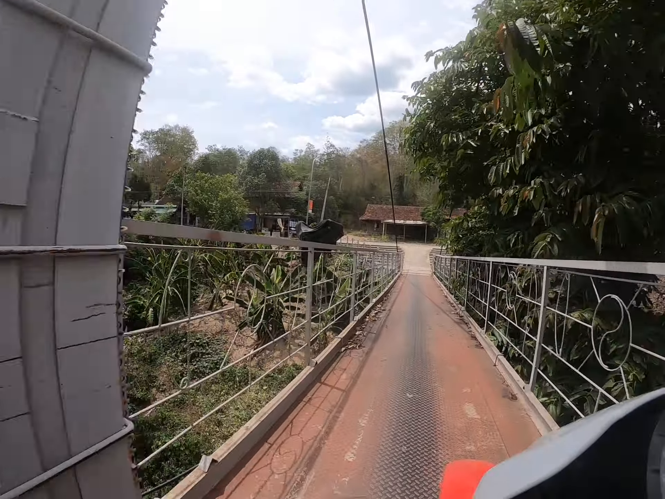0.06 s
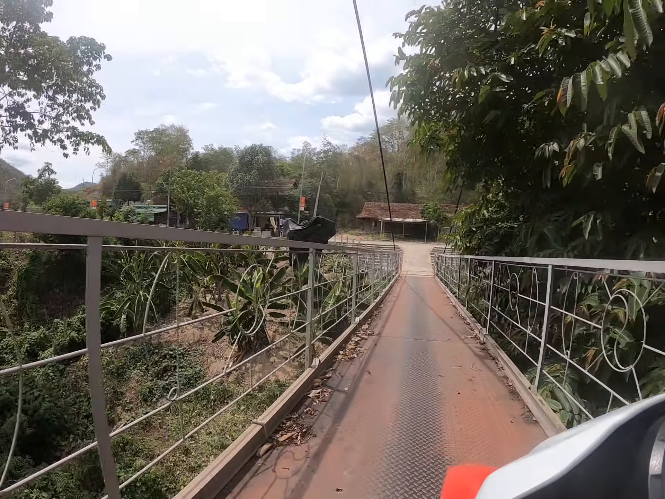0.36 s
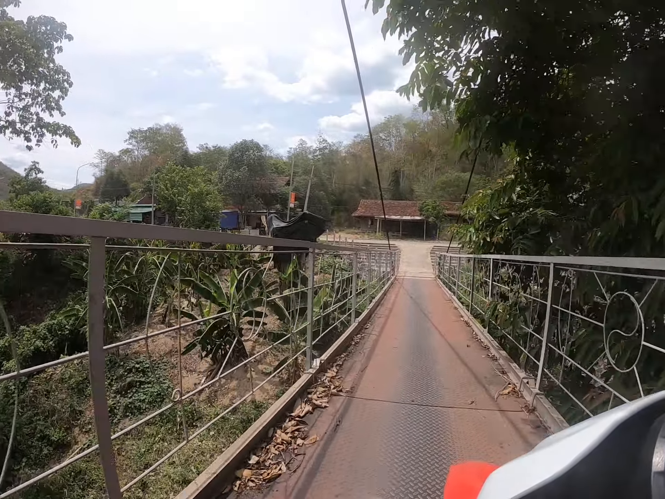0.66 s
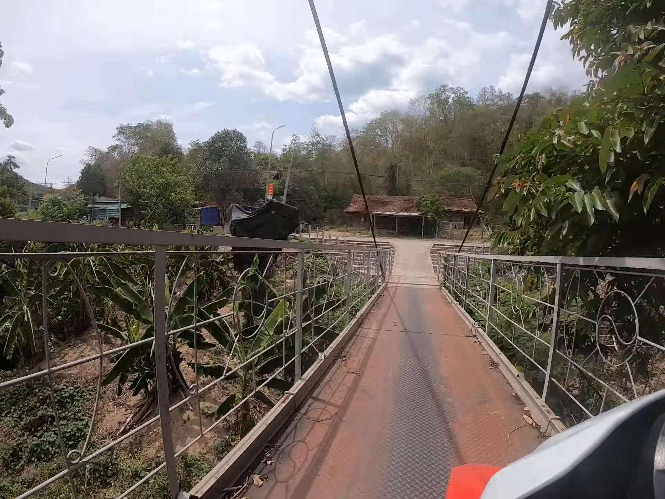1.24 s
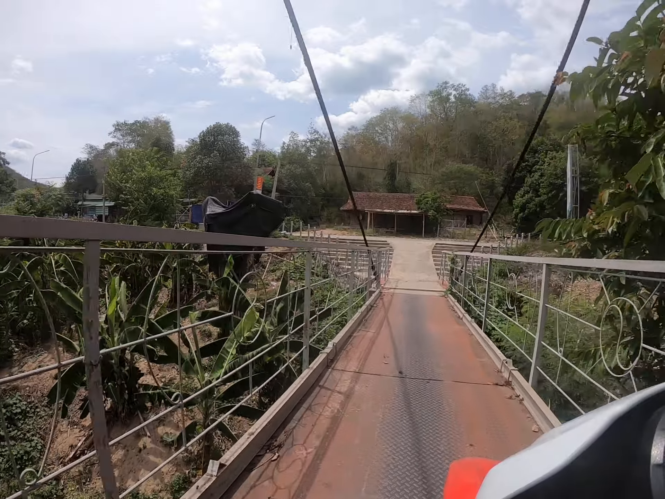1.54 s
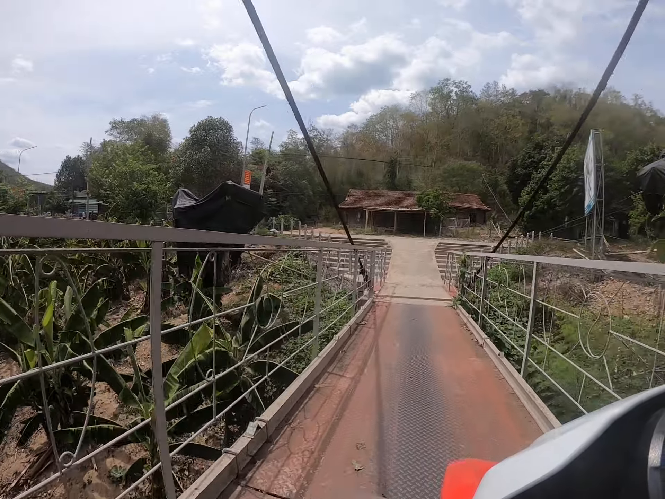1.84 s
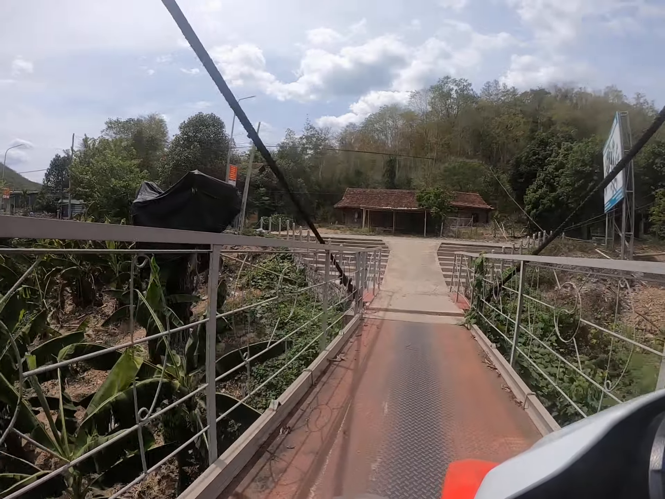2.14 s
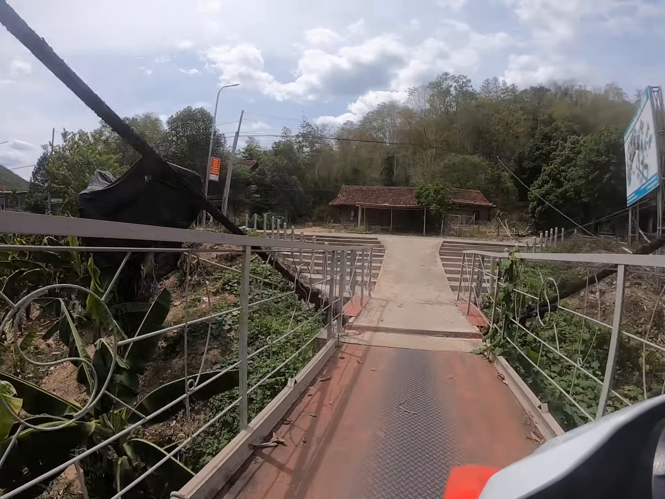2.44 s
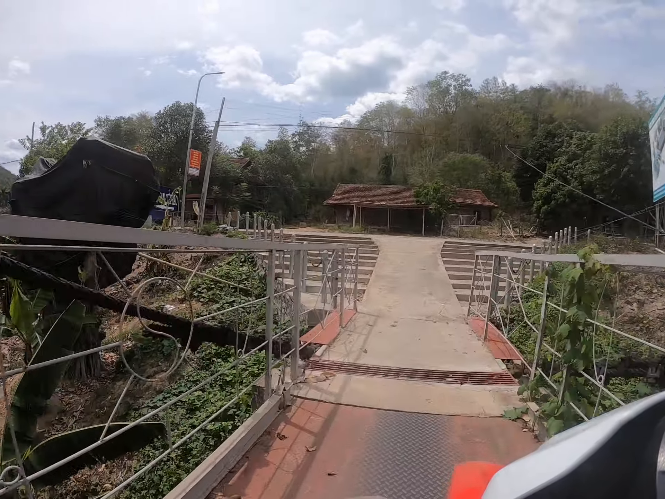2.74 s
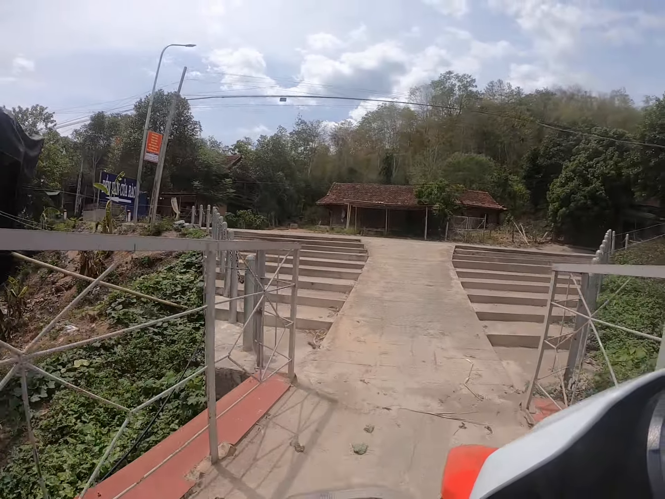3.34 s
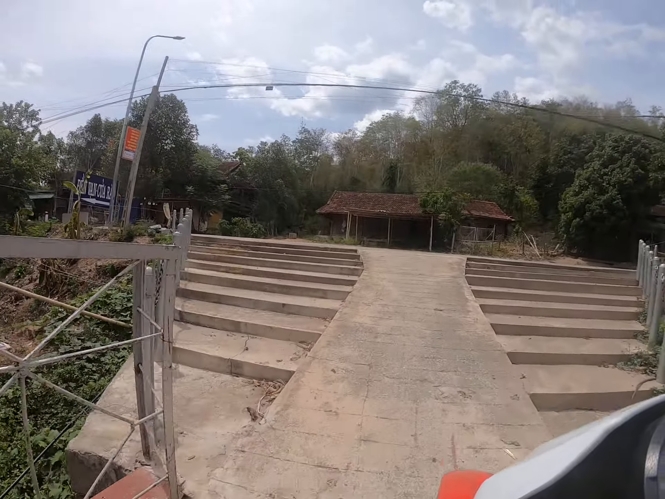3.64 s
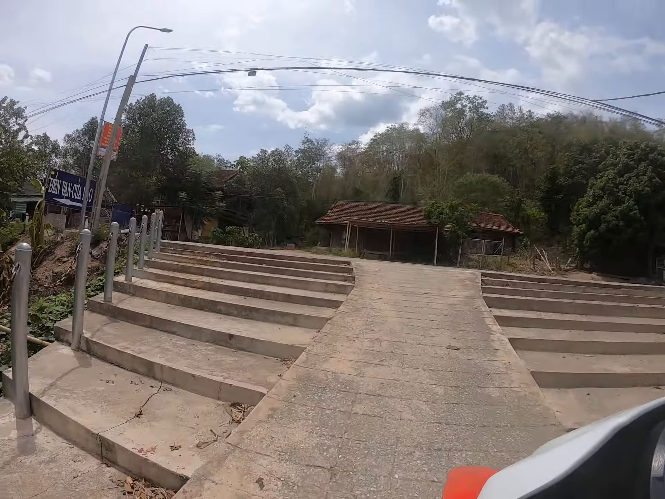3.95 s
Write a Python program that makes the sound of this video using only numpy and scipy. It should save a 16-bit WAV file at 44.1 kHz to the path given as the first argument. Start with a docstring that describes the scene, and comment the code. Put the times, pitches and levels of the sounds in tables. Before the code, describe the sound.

Small motorbike riding across a steel bridge, with deck rumble, thumps and metallic rattles.

```python
"""Small motorbike over a steel bridge deck

Heard from the saddle, a single-cylinder bike rides over the deck and off onto concrete.
The engine burbles, picks up after a second and slowly sags; valves clatter, the piston ticks
and a gear whines. The deck rumbles and booms under the tyres, plate joints set off thumps
and rattles, and loose parts tick and clank."""
import sys
import numpy as np
from scipy import signal
from scipy.fft import rfft, irfft, next_fast_len
from scipy.io import wavfile
from scipy.ndimage import map_coordinates

SR = 44100
rng = np.random.default_rng(int(sys.argv[2]) if len(sys.argv) > 2 else 0)


def generate_wav(signal):
    """Clip the signal to [-1, 1] and save it as 16-bit WAV at the path in sys.argv[1]."""
    frames = np.transpose(np.atleast_2d(signal))
    scaled = np.clip(frames, -1, 1) * 32767
    pcm = np.round(scaled).astype(np.int16)
    wavfile.write(sys.argv[1], SR, pcm)


N = 176400
T = np.arange(N) / SR


def amp(db):
    """Decibels to gain."""
    return 10 ** (np.asarray(db) / 20)


def unit(x):
    """Scale to rms 1."""
    return x / np.sqrt(np.mean(x ** 2) + 1e-20)


def along(points, hz):
    """Interpolate (Hz, value) points on a log axis."""
    points_hz, values = np.transpose(points)
    return np.interp(np.log(hz + 1), np.log(points_hz + 1), values)


def curve(rows):
    """Interpolate (s, value) points at every sample."""
    return np.interp(T, *np.transpose(rows))


def wobble(rate_hz):
    """Smooth random curve, rate_hz knots a second."""
    return map_coordinates(rng.standard_normal(8192), [T * rate_hz], mode="wrap")


def band(hz, centre_hz, q):
    """Gain of one resonance."""
    return 1 / np.hypot(1, q * (hz / centre_hz - centre_hz / (hz + 1)))


def filtered(x, gain, causal=False):
    """Apply gain(hz) to x, with minimum phase if causal."""
    size = 2 * next_fast_len(N // 2 + 8192)
    response = gain(np.fft.rfftfreq(size, 1 / SR))
    if causal:
        cepstrum = irfft(np.log(np.maximum(response, 1e-6)))
        cepstrum[1:size // 2] *= 2
        cepstrum[size // 2 + 1:] = 0
        response = np.exp(rfft(cepstrum))
    return irfft(rfft(x, size) * response, size)[:N]


def noise(spectrum, centre_hz=1, q=0):
    """Noise of rms 1 shaped by (Hz, dB) points and, if q > 0, one resonance."""
    white = rng.standard_normal(N)
    return unit(filtered(white, lambda hz: amp(along(spectrum, hz)) * band(hz, centre_hz, q)))


def burst(start_s, attack_s, hold_s, decay_s):
    """Linear attack; exponential decay from hold_s after the start."""
    rise = np.clip((T - start_s) / attack_s, 0, 1)
    return rise * np.exp(-np.maximum(T - start_s - hold_s, 0) / decay_s)


def pulses(cycles, share, scatter_db):
    """One uneven impulse each time the engine passes this share of its cycle."""
    hit = np.diff(np.floor(cycles - share), prepend=np.floor(-share))
    return hit * amp(scatter_db * rng.standard_normal(256))[cycles.astype(int)]


def strikes(cycles, share, decay_s):
    """A decaying noise burst at the same point of every cycle."""
    pole = np.exp(-1 / (decay_s * SR))
    envelope = signal.lfilter([1], [1, -pole], pulses(cycles, share, scatter_db=1.5))
    return envelope * rng.standard_normal(N)


def tyre_rumble():
    """Tyres on the deck, with wind in the lowest bass."""
    # Each row: time in seconds, level in dB.
    rolling_level = [(0, -19.5), (.11, -22.5), (.17, -24.5), (.42, -17.5), (.52, -19), (.71, -22.5),
                     (.82, -16), (1.08, -19.5), (1.2, -21), (1.85, -20), (2.2, -24), (3.2, -22.5),
                     (3.55, -24.5), (3.8, -27), (4, -33)]
    # Each row: frequency in Hz, relative level in dB.
    deck_spectrum = [(15, -40), (28, -4), (45, 0), (60, -1.5), (75, 0), (120, -1.5), (190, -6.5),
                     (240, -14), (310, -12), (400, -22.5), (800, -22.5), (1500, -35.5), (5000, -52),
                     (12000, -100)]
    return amp(curve(rolling_level) + 0.09 * wobble(14)) * noise(deck_spectrum)


def panel_booms():
    """Each deck panel hums near its own note as the bike rolls over it."""
    # Each row: start in seconds, hold in seconds, pitch in Hz, level in dB.
    panels = [(0.46, 0.96, 64, -29), (0.625, 0.44, 140, -28.5), (0.937, .14, 121, -26),
              (.98, 0.059, 197, -26), (1.194, 0.26, 143, -21.5), (1.739, 0.22, 126, -20),
              (2.392, 0.28, 131, -26), (3.234, .05, 175, -28)]
    edge_s = 0.016
    out = np.zeros(N)
    for start_s, hold_s, hz, db in panels:
        envelope = amp(db + 1.6 * wobble(5.7)) * burst(start_s, edge_s, hold_s, edge_s)
        out += envelope * np.sin(2 * np.pi * (hz * T + rng.random()) + .5 * wobble(5.5))
    return out


def road_joints():
    """Each joint in deck or concrete thumps the wheels and shakes out a rough metallic rattle."""
    # Each row: start in seconds, hold in seconds, thump in dB, thump centre in Hz, rattle in dB.
    joints = [(0.125, 0.041, -16.5, 103, -32), (0.173, 0.036, -15, 199, -33.5),
              (0.215, 0.057, -24, 253, -33), (0.328, 0.046, -17, 125, -31),
              (0.384, 0.012, -14.5, 129, -31.5), (0.804, 0.015, -18, 121, -28),
              (0.829, 0.059, -23.5, 151, -32.5), (0.895, 0.21, -26.5, 160, -39.5),
              (3.232, 0.041, -18.5, 310, -34), (3.531, 0.0082, -25.5, 320, -39),
              (3.884, 0.087, -28, 296, -44)]
    # Each row of both: frequency in Hz, relative level in dB.
    thump_spectrum = [(30, -19), (100, -3), (170, 4.5), (250, -2), (310, 5.5), (420, -4.5), (800, 0),
                      (1200, -39), (3000, -32), (8000, -67)]
    rattle_spectrum = [(200, -6), (500, 11.5), (800, 7), (1400, -4.5), (2000, 0), (3400, -2), (4500, -10),
                       (6000, -23), (8000, -20.5), (11000, -37), (12500, -43), (15000, -60)]
    attack_s, roughness_db = 0.005, 1.5
    thumps, shake = np.zeros(N), np.zeros(N)
    for start_s, hold_s, thump_db, centre_hz, rattle_db in joints:
        thump = noise(thump_spectrum, centre_hz, q=2.43)
        thumps += amp(thump_db) * burst(start_s, attack_s, hold_s, decay_s=0.028) * thump
        shake += amp(rattle_db) * burst(start_s, attack_s, hold_s, decay_s=0.024)
    rattle = unit(amp(roughness_db * wobble(360)) * noise(rattle_spectrum))
    return thumps + shake * rattle


def loose_ticks():
    """Loose parts clack, each around its own pitch."""
    # Each row: start in seconds, level in dB, centre in Hz, decay in seconds.
    ticks = [(0.041, -33, 1400, .008), (0.097, -28, 1410, 0.0052), (.13, -25, 3300, .007),
             (.153, -23, 1500, .008), (0.241, -21, 2000, .008), (0.243, -43, 8200, 0.022),
             (.275, -37.5, 3520, 0.04), (0.3, -28, 1410, 0.0054), (.328, -26, 3100, .003),
             (.338, -23.5, 3070, .016), (.392, -30, 4000, .005), (.405, -50, 8000, 0.03),
             (.368, -30, 2800, .008), (.416, -23, 850, .007), (0.514, -31, 1400, 0.0059),
             (0.591, -27, 1400, 0.0051), (.811, -31, 2200, .007), (.835, -27, 2600, .007),
             (0.845, -41, 7200, 0.03), (.852, -23, 3600, .01), (.869, -23, 2700, .009),
             (2.875, -20, 1400, 0.004), (3.067, -23, 4000, 0.0028), (3.584, -31, 3000, 0.0067),
             (3.624, -23, 3160, .011)]
    # Each row: frequency in Hz, relative level in dB.
    tick_spectrum = [(200, -5), (1000, 30.5), (4000, 3), (8000, -3), (11000, -10), (13000, -23),
                     (15000, -38)]
    attack_s = .0015
    out = np.zeros(N)
    for start_s, db, centre_hz, decay_s in ticks:
        envelope = amp(db) * burst(start_s, attack_s, 2 * attack_s, decay_s)
        out += envelope * noise(tick_spectrum, centre_hz, q=3.2)
    return out


def metal_clanks():
    """A loose metal part is struck and rings briefly."""
    # Each row: start in seconds, level in dB, pitch in Hz, decay in seconds.
    clanks = [(0.2432, -11.5, 1405, .0035), (3.975, -27, 1462, .03), (3.978, -26, 1587, .03)]
    attack_s = 0.0013
    out = np.zeros(N)
    for start_s, db, hz, decay_s in clanks:
        envelope = amp(db) * burst(start_s, attack_s, 2 * attack_s, decay_s)
        out += envelope * np.sin(2 * np.pi * hz * (T - start_s) + .5 * wobble(150))
    return out


def drive_ring():
    """One sharp metallic mode of the drive sings while the engine pulls."""
    # Each row: time in seconds, level in dB.
    ring_level = [(0, -62), (1.3, -56), (1.45, -46), (1.7, -48), (1.8, -41), (2.2, -42), (2.7, -48),
                  (3, -42.5), (3.7, -45), (4, -53)]
    mode_hz, blur_rad, waver_db = 3170, 1.7, 3
    ring = np.sin(2 * np.pi * mode_hz * T + blur_rad * wobble(50))
    return amp(curve(ring_level)) * unit(amp(waver_db * wobble(25.2)) * ring)


def gear_whine(cycles):
    """A fuzzy mesh tone that swells and chirps with every power stroke."""
    # Each row: time in seconds, level in dB.
    whine_level = [(0, -62), (1.1, -54), (1.35, -48), (1.6, -52), (2.3, -48), (2.5, -42), (2.8, -40.5),
                   (3.1, -48), (3.25, -43.5), (3.42, -44), (3.7, -55)]
    mesh_order, ripple_rad, blur_hz = 119.5, 1.3, 35
    throb_db, waver_db = 3.5, 1
    cycle_rad = 2 * np.pi * cycles
    mesh_rad = mesh_order * cycle_rad + ripple_rad * np.sin(cycle_rad)
    fuzz = wobble(2 * blur_hz) * np.sin(mesh_rad) + wobble(2 * blur_hz) * np.cos(mesh_rad)
    tone = np.sin(mesh_rad) + .7 * fuzz
    swell = amp(throb_db * np.sin(cycle_rad) + waver_db * wobble(5.4))
    return amp(curve(whine_level)) * unit(tone * swell)


def piston_slap(cycles):
    """The piston knocks the cylinder once a cycle: a dry tick, hardest as the throttle eases."""
    # Each row: time in seconds, level in dB.
    slap_level = [(0, -54), (1.1, -51), (1.3, -46), (2, -48), (2.6, -46.5), (3, -42), (3.5, -42.5),
                  (4, -46)]
    knocks = strikes(cycles, share=.16, decay_s=.0026)
    cylinder = filtered(knocks, lambda hz: band(hz, centre_hz=2300, q=4.2) ** 2, causal=True)
    return amp(curve(slap_level)) * unit(cylinder)


def valve_clatter(cycles):
    """Valve and piston impacts and a wash of friction ring the casing, brighter under load."""
    # Each row: share of the cycle, relative level in dB, centre in Hz, decay in seconds.
    impacts = [(.08, 2.5, 3850, .0035), (.12, -3, 1400, .003), (.55, -7, 1550, .016), (.59, -1, 3850, .002),
               (.82, 6, 3850, .004)]
    # Each row: frequency in Hz, relative gain in dB.
    casing_colour = [(100, -17.5), (280, 0), (450, 0.5), (800, -16.5), (1050, -10), (1500, -3), (2000, -10),
                     (3000, -15.5), (4300, -23), (5000, -27.5), (6100, -31.5), (7500, -25), (9500, -36),
                     (10900, -42), (11800, -55), (13300, -49), (15000, -81)]
    # Each row: centre in Hz, width in Hz, rise in dB.
    casing_modes = [(292.3, 48, 12.5), (595.3, 28, 13.5), (920, 27, 5), (1350.5, 176, 12), (1653, 136, 6.5),
                    (2260, 110, 9), (3020, 460, 9), (3480, 39, 7), (3900, 83, 4.5), (4010, 84, 12),
                    (4355, 80, 7.5), (5420, 200, 3.5)]
    # Each row: time in seconds, level in dB before the treble shelf.
    effort = [(0, -30.5), (.65, -31.5), (1.1, -30.5), (1.45, -27.5), (2, -28), (2.7, -27), (3.4, -27.5),
              (3.75, -28.5), (4, -28)]
    friction_db = -6.5
    shelf_hz, shelf_db_per_db, flat_at_db = 2030, 0.87, -26

    def casing_gain(hz):
        modes_db = sum(rise_db / (1 + (2 * (hz - centre_hz) / width_hz) ** 2)
                       for centre_hz, width_hz, rise_db in casing_modes)
        return amp(along(casing_colour, hz) + modes_db)

    hits = np.zeros(N)
    for share, db, centre_hz, decay_s in impacts:
        strike = strikes(cycles, share, decay_s)
        hits += amp(db) * filtered(strike, lambda hz: band(hz, centre_hz, q=1.7) ** 2)
    friction = amp(friction_db) * rng.standard_normal(N)
    ring = unit(filtered(hits + friction, casing_gain, causal=True))
    treble = filtered(ring, lambda hz: 1 - 1 / (1 + (hz / shelf_hz) ** 6))
    effort_db = curve(effort)
    treble_gain = amp(shelf_db_per_db * (effort_db - flat_at_db))
    return amp(effort_db) * (ring - treble + treble_gain * treble)


def engine_drone(cycles):
    """Low engine orders and thin gear lines, locked to the crank and wavering in level."""
    # Each entry: a multiple of the firing rate.
    orders = [2, 3, 4, 5, 7.15, 8, 9, 11.3, 12, 22, 28.7, 34.5, 43.9, 51, 53, 65.2, 80.2, 123.5]
    # Each entry: that order's relative level in dB.
    orders_db = [-9, -10, 1, -4, -12, -17, -22, -19, -24, -26, -24, -25, -30, -22, -22, -22, -31, -28]
    # Each row: time in seconds, level in dB.
    drone_level = [(0, -37), (1.15, -34), (1.52, -22.5), (2.1, -22.5), (2.7, -24), (3.3, -26), (3.55, -28),
                   (3.75, -37), (4, -39)]
    waver_db = 2
    lines = np.zeros(N)
    for order, db in zip(orders, orders_db):
        gain = amp(db + waver_db * wobble(7.2))
        lines += gain * np.sin(2 * np.pi * (order * cycles + rng.random()))
    return amp(curve(drone_level)) * unit(lines)


def exhaust(cycles):
    """One puff per firing through the pipe."""
    # Each row: frequency in Hz, relative gain in dB.
    pipe_response = [(20, -41), (50, -3), (110, -5.5), (180, 10.5), (240, -5), (300, 2), (380, -9.5),
                     (590, -18), (1000, -57.5), (2500, -66), (6000, -110)]
    # Each row: time in seconds, level in dB.
    exhaust_level = [(0, -29), (.5, -35), (1.1, -25.5), (1.55, -38), (2.6, -30.5), (3.4, -31.5),
                     (3.75, -30.5), (4, -41)]
    firings = pulses(cycles, share=0, scatter_db=2.5)
    puffs = filtered(firings, lambda hz: amp(along(pipe_response, hz)), causal=True)
    return amp(curve(exhaust_level)) * unit(puffs)


def scene():
    """Engine and road at the saddle, mono."""
    # Each row: time in seconds, firings per second.
    firing_rate = [(0, 20), (.45, 20), (.7, 21.7), (1.12, 19.3), (1.3, 22.8), (1.52, 27.1), (1.8, 26.4),
                   (2, 26.1), (2.3, 25.15), (3.1, 23.4), (3.35, 23.3), (3.55, 22.8), (3.7, 20.8), (4, 19.5)]
    cycles = np.cumsum(curve(firing_rate)) / SR
    engine = exhaust(cycles) + engine_drone(cycles) + valve_clatter(cycles) + piston_slap(cycles)
    drive = gear_whine(cycles) + drive_ring()
    road = tyre_rumble() + panel_booms() + road_joints()
    return (engine + drive + road + loose_ticks() + metal_clanks())[None]


def record(dry):
    """The microphone adds faint hiss, dulls the top octave and cuts off at its band limit."""
    # Each row: frequency in Hz, gain in dB.
    mic_response = [(10800, 0), (11700, -2), (13500, -2), (15000, -12)]
    hiss_db, limit_hz = -82, 15100
    hiss = amp(hiss_db) * rng.standard_normal(N)
    return filtered(dry[0] + hiss, lambda hz: amp(along(mic_response, hz)) * (hz < limit_hz))[None]


dry = scene()
out = record(dry)
generate_wav(out)
```